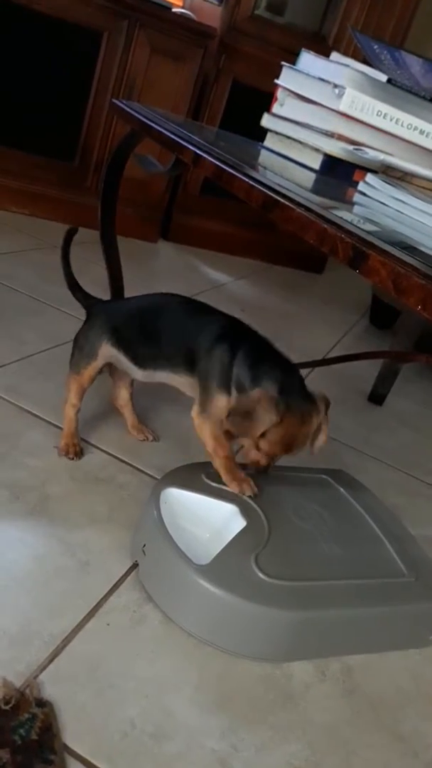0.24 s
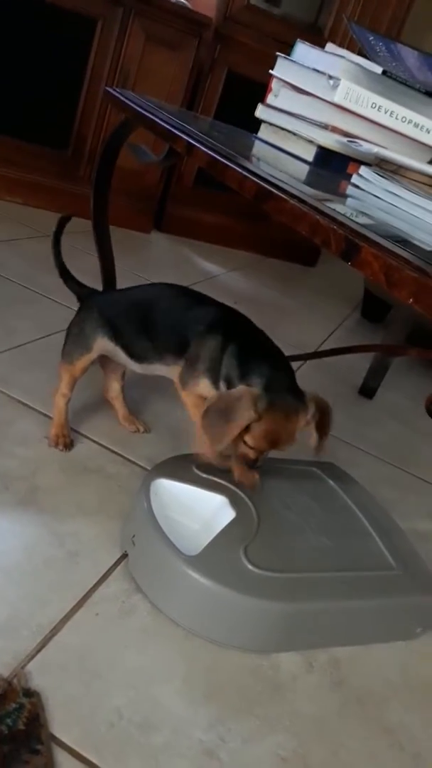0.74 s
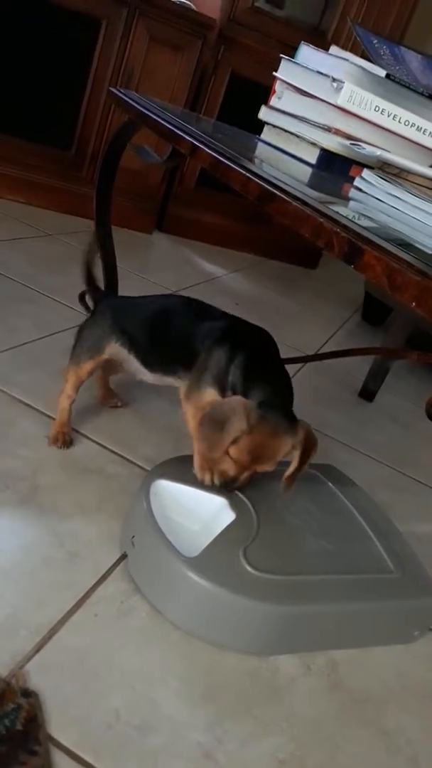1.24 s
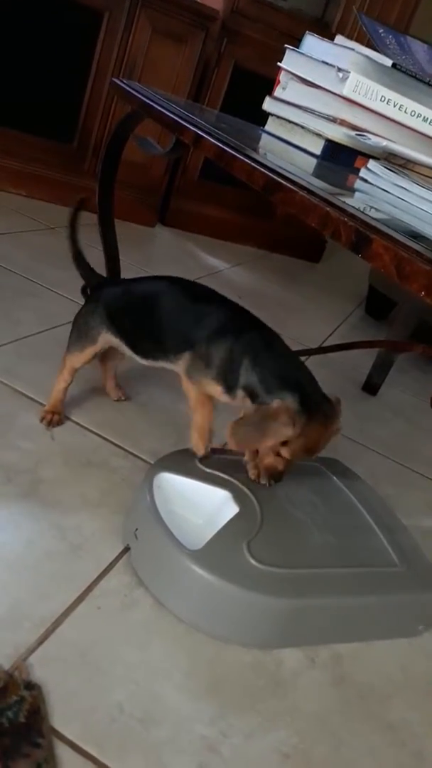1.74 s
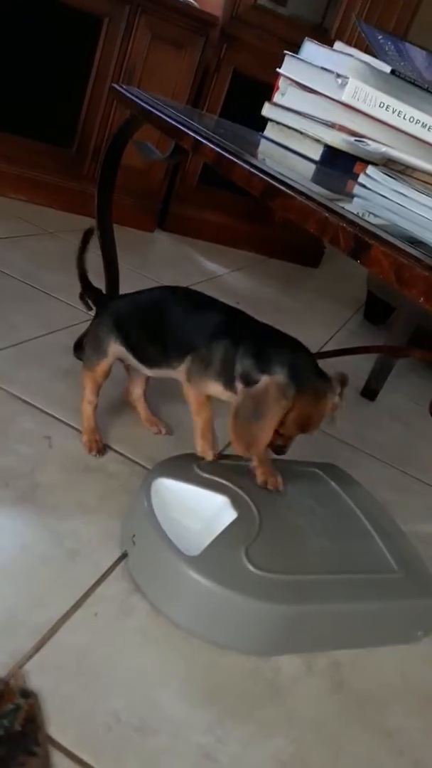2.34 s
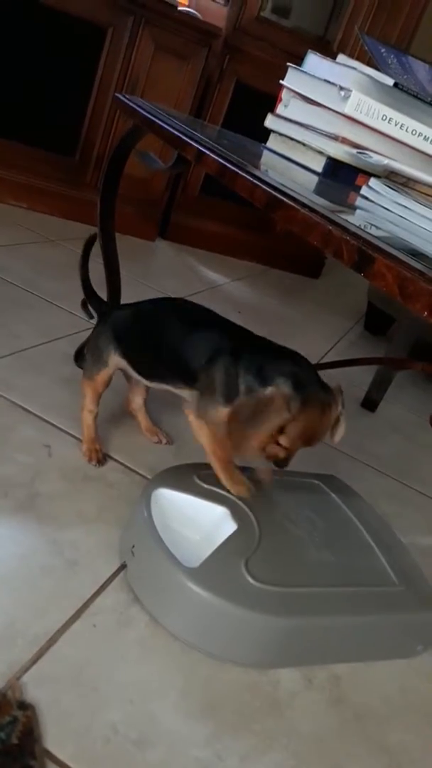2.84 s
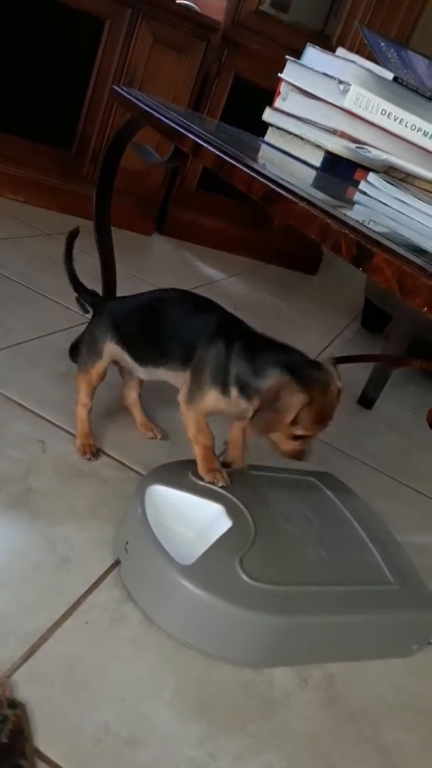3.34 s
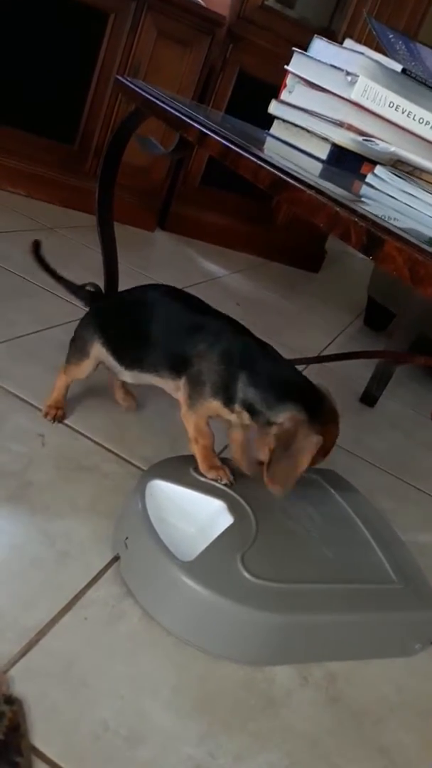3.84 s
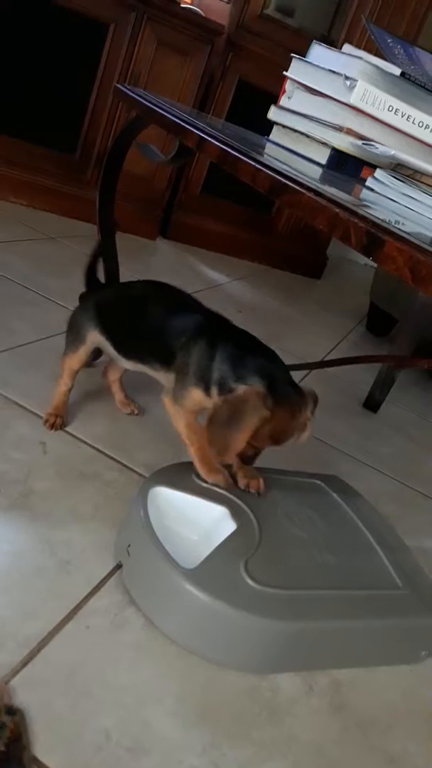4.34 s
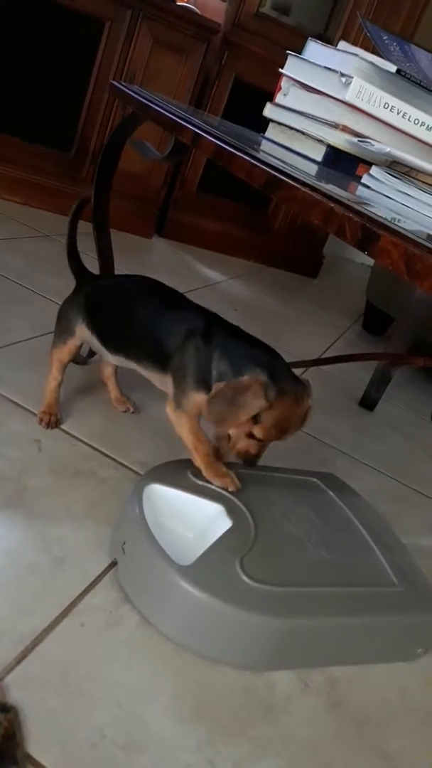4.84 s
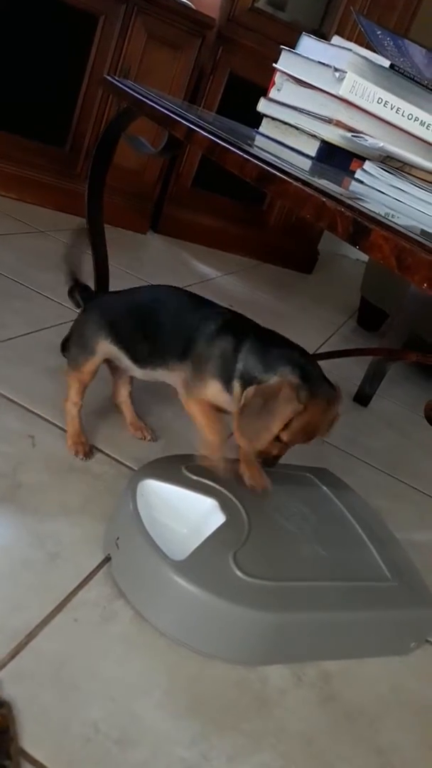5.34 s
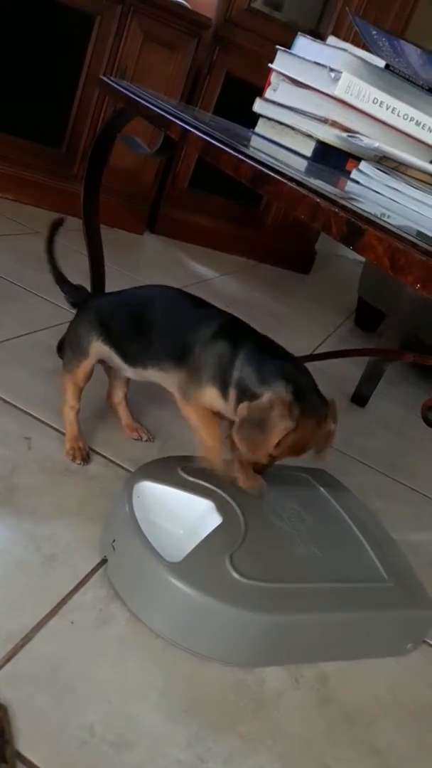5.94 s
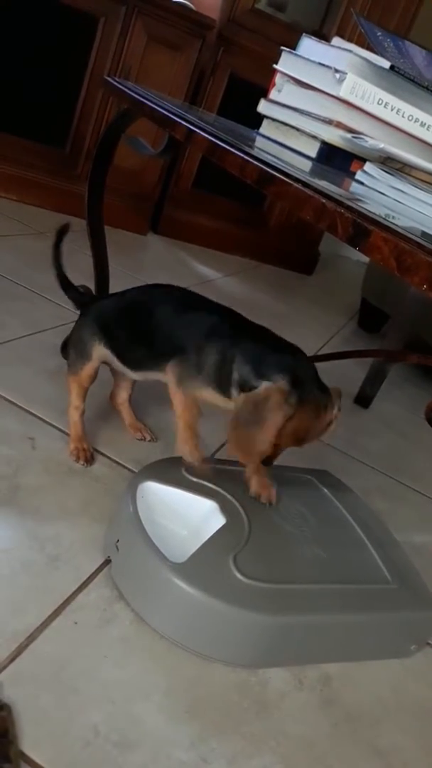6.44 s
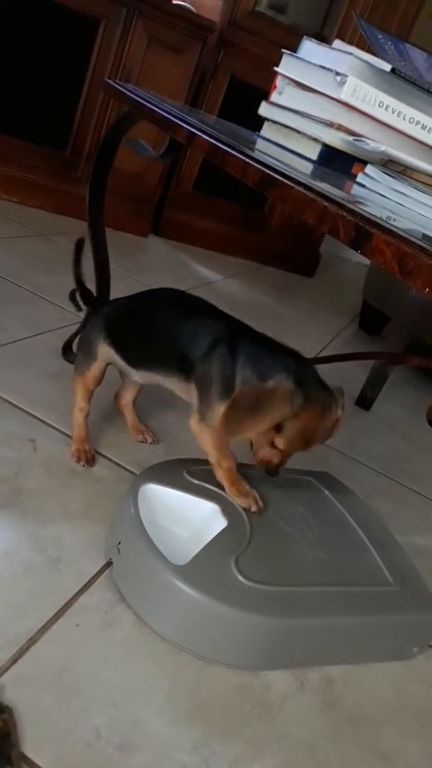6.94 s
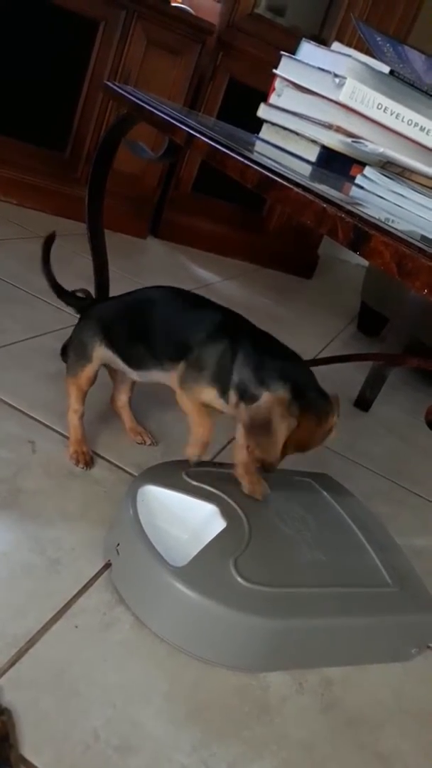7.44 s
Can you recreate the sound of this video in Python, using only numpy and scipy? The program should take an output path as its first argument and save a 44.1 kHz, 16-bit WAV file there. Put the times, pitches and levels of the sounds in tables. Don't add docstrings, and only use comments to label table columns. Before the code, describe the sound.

A small dog paws at a hollow hard plastic lid, a step from a stereo microphone in a furnished, tiled room. From 0 to 0.95 seconds, bright claw snaps come about seven a second, alternating single slaps with quick multi-toe rakes, over soft low drum thumps and gritty pad drag. From 1 to 1.6 it drops to faint ticks and light fur swishes. Strokes return around 1.7 and run briskly from 2 to 3.3, claws clicking and scraping the thin ringing wall. Around 3.4 to 4 there is a sparse lull with a few lighter taps. Digging rebuilds from 4.1, slightly uneven, with a hard claw catch near 4.5. From 5.4 until the end near 7.7, steady alternating scratches continue, growing firmer after 6.5. Short room reflections and very quiet hiss surround everything; it stops mid-digging.

```python
import sys
import numpy as np
from scipy import signal
from scipy.fft import rfft, irfft, next_fast_len
from scipy.io import wavfile
from scipy.ndimage import uniform_filter1d

SR = 44100
rng = np.random.default_rng(int(sys.argv[2]) if len(sys.argv) > 2 else 0)


def convert_level_to_amplitude(level_db):
    exponent = np.asarray(level_db, float) / 20
    return 10 ** exponent


def to_wav(sig):
    pcm = np.clip(np.atleast_2d(sig), -1, 1) * 32767
    pcm = np.round(pcm).astype(np.int16)
    wavfile.write(sys.argv[1], SR, pcm.T)


N = 338688


def unit(x):
    return x / np.sqrt(np.mean(x ** 2) + 1e-20)


def along(points, hz):
    f, v = np.transpose(points)
    return np.interp(np.log(hz + 1), np.log(f + 1), v)


def filtered(x, response):
    m = 2 * next_fast_len(N // 2 + 8192)
    return irfft(rfft(x, m) * response(np.fft.rfftfreq(m, 1 / SR)), m)[..., :N]


def causal(db):
    c = irfft(np.log(convert_level_to_amplitude(db)))
    half = c.shape[-1] // 2
    c = c * np.r_[1, 2 * np.ones(half - 1), 1, np.zeros(half - 1)]
    return np.exp(rfft(c))


def modes(table):
    def response(f):
        total = 0
        for k, (center, width, db) in enumerate(table):
            damping = 1j * f * width
            total = total + (-1) ** k * convert_level_to_amplitude(db) * damping / (center * center - f * f + damping)
        return total
    return response


# frequency in Hz, left-right likeness (1 is identical).
LIKENESS = [(60, 1), (130, 0.92), (290, 0.74), (640, 0.67), (1410, -0.058), (3100, 0.33), (6820, -0.34),
            (15000, -0.074)]


def pair(noises):
    def blend(hz):
        turn = np.arccos(np.clip(along(LIKENESS, hz), -1, 1)) / 2
        return np.array([np.cos(turn), np.sin(turn)])
    mid, side = filtered(noises, blend)
    return np.array([mid + side, mid - side])


def placed(seconds, shapes):
    start = np.round(seconds * SR).astype(int)
    at = (start[:, None] + np.arange(shapes.shape[-1])).ravel()
    return np.array([np.bincount(at, shapes[:, c].ravel(), N)[:N] for c in range(2)])


# frequency in Hz, level in dB per Hz.
ROOM_TONE = [(18, -43.5), (30, -20), (118, 0.5), (449, -24.5), (526, -22), (1500, -31), (2750, -81),
             (4420, -46.5), (8080, -35), (16000, -44)]


def air():
    noise = rng.standard_normal((2, N))
    hiss = filtered(noise, lambda hz: convert_level_to_amplitude(along(ROOM_TONE, hz) - along(PORT, hz).clip(-15)))
    return convert_level_to_amplitude(-63.5) * pair(unit(hiss))


# frequency in Hz, time to fall by 60 dB in seconds.
ROOM_DECAY = [(100, 0.058), (300, 0.52), (1000, 0.35), (4000, 0.35), (8000, .3), (15000, 0.24)]


def room(x, size):
    count = N // size + 1
    hz, t, z = signal.stft(rng.standard_normal((count, 2, SR // 2)), SR, nperseg=256)
    walls = convert_level_to_amplitude(-60 * t / along(ROOM_DECAY, hz)[:, None])
    scatter = convert_level_to_amplitude(along([(2000, 4.7), (14000, 10)], hz)[:, None] - 60 * t / 0.02)
    tails = signal.istft(z * (walls + scatter), SR, nperseg=256)[1]
    tails = tails / np.sqrt(np.mean(np.sum(tails ** 2, -1)))
    parts = np.pad(x.mean(0), (0, count * size - N)).reshape(count, 1, size)
    wet = signal.fftconvolve(parts, tails, axes=2)
    return pair(placed(np.arange(count) * size / SR + .002, wet))


# time in seconds, level in dB.
DRAG_LEVEL = [(0.0, -36), (.25, -50), (.85, -46), (1.0, -79), (1.32, -47), (1.45, -70.5), (1.75, -45),
              (2.1, -52), (3.25, -48), (3.5, -66.5), (3.95, -73), (4.13, -54), (4.66, -43), (5.09, -64),
              (5.32, -51), (6.7, -47.5), (7.16, -46.5), (7.68, -45)]
# frequency in Hz, level in dB per Hz.
DRAG_COLOR = [(300, 11), (1000, 3.5), (3000, -7.5), (7000, -9), (12000, -0.5), (16000, -12.5)]
# start in seconds, length in seconds, level in dB.
FUR_SWEEPS = [
    (0.99, 0.019, -53),
    (.785, 0.024, -50.5),
    (1.28, 0.043, -47),
    (1.16, 0.012, -64.5),
    (1.8, 0.01, -54),
    (3.522, 0.042, -67),
    (3.57, 0.015, -68),
    (3.87, 0.013, -50.5),
    (3.886, 0.0093, -50.5),
    (4.9, 0.037, -75),
]


def rub():
    s, db = np.transpose(DRAG_LEVEL)
    t = np.arange(N) / SR
    noise = rng.standard_normal((2, N))
    grain_db = 4.3 * unit(uniform_filter1d(rng.standard_normal(N), size=60))
    hiss = filtered(noise * convert_level_to_amplitude(grain_db), lambda hz: convert_level_to_amplitude(along(DRAG_COLOR, hz)))
    swish = filtered(rng.standard_normal((2, N)), modes([(9500, 5500, 0)]))
    sweeps = sum(convert_level_to_amplitude(level) * np.sin(np.pi * np.clip((t - at) / span, 0, 1))
                 for at, span, level in FUR_SWEEPS)
    return convert_level_to_amplitude(np.interp(t, s, db) - 12.5) * pair(unit(hiss)) + sweeps * pair(unit(swish))


# start in seconds, tip dB, edge dB re tip, pad dB, drum
# pitch in Hz.
SLAPS = [(0.0629, -11.5, -11, -42.5, 226), (0.3744, -8, -14, -41, 240), (.642, -6, -18, -47, 216),
         (1.2104, -31.5, 4, -58.5, 189), (1.5303, -27.5, -4, -73, 208), (1.8395, -15, -13, -49, 237),
         (2.0, -7, -15.5, -33.5, 221), (2.3123, -11.5, -15, -37.5, 218), (2.5865, -18, -12, -38.5, 219),
         (2.8777, -12, -15.5, -37, 244.7), (3.1825, -16, -9.5, -36, 219), (3.6884, -22, -20, -50, 192),
         (3.7954, -16, -17.5, -52.5, 205), (4.052, -26.5, -4, -65, 210), (4.299, -17.5, -10.5, -55, 183),
         (4.933, -17.5, -14.5, -45, 228), (5.079, -19.5, -15, -49.5, 213), (5.238, -18, -18, -52, 191),
         (5.8449, -12, -12, -37, 228), (6.144, -15, -13, -52, 193), (6.4431, -11, -11.5, -37.5, 244),
         (6.7443, -12.5, -12.5, -36, 240), (7.0464, -8.5, -19.5, -39.5, 188),
         (7.3665, -9.5, -14, -36.5, 216)]
# start in seconds, seconds until the
# claws bite, tip dB, edge dB re tip, pad dB.
RAKES = [(0.2091, .0154, -9.5, -10, -25.5), (0.5033, 0.0082, -11.5, -8, -28.5),
         (0.7851, .0104, -11.5, -11.5, -34.5), (0.928, 0.013, -17.5, -18.5, -40.5),
         (1.699, .0176, -13.5, -17, -35), (2.163, .0133, -10.5, -7.5, -29),
         (2.434, .0206, -14.5, -7.5, -39.5), (2.7236, .0182, -10, -9.5, -41.5),
         (3.0217, .0127, -12.5, -7.5, -38), (4.1402, 0.015, -17, -9.5, -34), (4.448, .0218, -18, 2.5, -39),
         (4.6205, .0163, -16, -8.5, -33.5), (4.77, .0105, -22, -2.5, -41), (5.389, .0233, -15, -2.8, -36.5),
         (5.5531, .0039, -17.5, -16.5, -47), (5.6874, .0099, -14.5, -10.5, -36),
         (5.9919, 0.015, -15, -14.5, -36.5), (6.286, .007, -16, -9.5, -36.5), (6.58, .0119, -8, -12.5, -30),
         (6.8912, .0103, -14.5, -10.5, -30), (7.1928, .0086, -10, -11.5, -28),
         (7.51, .0125, -14, -8.5, -28.5)]
# start in seconds, tip dB, edge dB re tip, pad dB, drum Hz.
FURTHER_STEPS = [(0.1014, -17.5, -4, -42, 216), (0.6647, -22, -11, -38.5, 207),
                 (1.2864, -28, -2.5, -63, 219), (1.648, -30.5, -3, -56, 218), (1.8743, -19, -11, -48, 208),
                 (1.9248, -10.5, -16.5, -47, 210), (2.1004, -10.5, -18, -41, 204),
                 (2.3324, -35, -6, -44.5, 219), (2.4395, -25, -0.5, -41.5, 222),
                 (2.7315, -29, -5, -38, 250), (2.987, -23, -15, -50, 250), (3.0415, -24, -1, -34, 250),
                 (3.2456, -16.5, -13.5, -50, 208), (3.3262, -21.5, -11.5, -48, 245),
                 (3.8995, -31, -4, -52.5, 210), (5.1122, -29.5, -11.5, -48.5, 244),
                 (5.2726, -41, -6, -57, 207), (5.4042, -20, -2, -49, 208), (5.57, -20, -12, -39, 247),
                 (5.8663, -17, -6, -39, 225), (6.1644, -23, -20, -38.5, 195), (6.9074, -25, -2, -39, 393),
                 (7.0723, -24, -18, -34.5, 215)]
SLAP_PAD_S, RAKE_PAD_S, FURTHER_PAD_S = .001, .008, -0.00398
RAKE_HZ = 207
RUMBLE_DB, RUMBLE_LAGS = -5, .3


def pads():
    rows = [(s + SLAP_PAD_S, db, hz) for s, _, _, db, hz in SLAPS]
    rows += [(s + RAKE_PAD_S, db, RAKE_HZ) for s, _, _, _, db in RAKES]
    rows += [(s + FURTHER_PAD_S, db, hz) for s, _, _, db, hz in FURTHER_STEPS]
    return [(s, db, hz, RUMBLE_DB - RUMBLE_LAGS * (db + 41)) for s, db, hz in rows]


# frequency in Hz, width in Hz, level in dB.
LID = [(108, 51, 0.5), (277, 52, -1), (379, 96, -4), (494, 72, -3), (608, 75, -8), (789, 34, -6.5),
       (962, 120, -13)]


def paws():
    s, db, drum_hz, rumble_db = np.transpose(pads())
    t = np.arange(4000) / SR
    swell = (t / 0.013) ** 1.25 * np.exp(1.5 - 1.545 * t / .012) * convert_level_to_amplitude(db[:, None])
    drum = swell * np.sin(2 * np.pi * drum_hz[:, None] * t)
    grit = rng.standard_normal((len(s), 2, len(t)))
    push = swell[:, None] * grit * convert_level_to_amplitude(rumble_db + 23)[:, None, None]
    start = np.maximum(s - .006, 0)
    rumble = pair(filtered(placed(start, push), modes(LID)))
    return placed(start, drum[:, None] * [[1], [1]]), rumble


# start in seconds, tip dB, edge dB re tip, wall dB re tip.
FLICKS = [(0.0721, -10, -25.5, -15), (0.1108, -8.5, -12.5, -22), (0.3367, -21, -25, -19),
          (0.657, -26, -15, -22), (2.012, -17, -7, -30), (2.0269, -21.5, -6, -11), (2.1086, -23, -20, -9),
          (2.1543, -19, -9.5, -11.5), (2.3617, -25.5, -7, -14), (2.9603, -15, -14, -16.5),
          (3.281, -21, -12.5, -27), (3.7163, -17.5, -25, -17.5), (3.743, -21.5, -15, -15.5),
          (3.8178, -13, -19, -20.5), (4.3368, -25.5, -26, -23), (4.458, -15, -3.5, -17),
          (4.4853, -4, -12.5, -15.5), (4.8021, -16, -7.5, -13), (5.339, -23, -15, -8),
          (5.624, -24, -10, -14), (5.936, -18.5, -14, -7.5), (5.9957, -28, 3, -10), (6.2167, -20, -13, -10),
          (6.5089, -20, -11, -11.5), (6.8287, -16.5, -12.5, -11), (7.1302, -18.5, -9.5, -8),
          (7.211, -12, -9, -7.5), (7.4418, -18, -13, -11.5), (7.528, -9, -8, -8),
          (7.6784, -10.5, -35, -10.5)]
# start in seconds, tip dB, edge dB re tip.
TICKS = [(1.077, -44, -3.5), (1.214, -35.5, -2.2), (1.2644, -34, -2), (1.3195, -36.5, -5.5),
         (1.3283, -31, -4), (1.493, -61.5, 11), (1.5228, -34, -16), (1.6855, -29.5, -6),
         (1.8355, -24.5, -9.5), (2.0919, -35.5, 5.5), (2.1276, -31.5, -11), (2.3418, -31, -1.5),
         (2.9439, -31, -5.5), (3.359, -25.5, -13.5), (4.378, -36, -8), (4.9477, -30, -10),
         (5.0969, -39.5, 3.5), (5.2821, -34, -1.5), (5.317, -28, -6.5), (5.5787, -26, -11.5),
         (5.7134, -23, -6.5), (5.9213, -30, -7), (6.1556, -26, -14), (6.418, -35.5, -5.5),
         (6.496, -41.5, 9), (6.797, -24.5, -14), (7.0655, -20.5, -14), (7.0925, -35, 4), (7.122, -34, -9),
         (7.359, -29, -13)]
TOUCH_DB, TOUCH_EDGE_DB = -12.5, 2
SECOND_DB, SECOND_EDGE_DB = -12, -1
LAST_TOE_S, LAST_TOE_DB, LAST_EDGE_DB = .0066, -5, 3
WALL_DB, WALL_FOLLOWS = -7.5, 0.57


def contacts():
    firm = [row[:3] for row in SLAPS + FURTHER_STEPS]
    for s, wait, db, edge_db, _ in RAKES:
        firm += [(s, db + TOUCH_DB, edge_db + TOUCH_EDGE_DB),
                 (s + wait / 2, db + SECOND_DB, edge_db + SECOND_EDGE_DB),
                 (s + wait, db, edge_db),
                 (s + wait + LAST_TOE_S, db + LAST_TOE_DB, edge_db + LAST_EDGE_DB)]
    rows = [(s, db, edge_db, WALL_DB + WALL_FOLLOWS * edge_db) for s, db, edge_db in firm]
    return rows + FLICKS + [(s, db, edge_db, edge_db - 0.6) for s, db, edge_db in TICKS]


def bursts(count, rise, t60, size):
    t = np.arange(size) / SR
    shape = (1 - np.exp(-t / rise)) * convert_level_to_amplitude(-60 * t / t60)
    grit = rng.standard_normal((count, 2, size)) * shape
    return grit * np.linalg.norm(shape) / np.linalg.norm(grit, axis=2, keepdims=True)


# frequency in Hz, width in Hz, level in dB.
SHELL = [(880, 520, -4.5), (1508, 151, 6), (1813, 254, 4.5), (2386, 506, 3.5), (3600, 300, -26.5)]


def struck(contact):
    s, db, edge_db, wall_db = np.transpose(contacts())
    tip = placed(s, convert_level_to_amplitude(db + 9)[:, None, None] * contact(.0001, 0.0024))
    edge = placed(s, convert_level_to_amplitude(db + edge_db + 1.0)[:, None, None] * contact(0.00018, 0.0087))
    wall = placed(s, convert_level_to_amplitude(db + wall_db + 10.5)[:, None, None] * contact(0.00098, 0.0098))
    tip = filtered(tip, modes([(15210, 5550, 0.0022)]))
    edge = filtered(edge, modes([(6030, 8100, 0)]))
    return tip + edge + filtered(wall, lambda hz: modes(SHELL)(hz) + convert_level_to_amplitude(4.0) * modes(LID)(hz))


# frequency in Hz, gain in dB.
FAR_PORT = [(1000, 1), (4000, -6), (8000, -6.5), (13000, -8.5)]


def claws():
    count = len(contacts())
    gritty = pair(struck(lambda rise, t60: bursts(count, rise, t60, size=1200)))
    even = struck(lambda rise, t60: np.full((1, 2, 1), np.sqrt(t60 * SR / np.log(1e6))))
    near = filtered(gritty, lambda hz: convert_level_to_amplitude(along(FAR_PORT, hz) * np.array([[1], [0]])))
    spread = filtered(even, lambda hz: convert_level_to_amplitude(along([(7000, 0), (14000, -6.5)], hz)))
    return near, spread


def scene():
    near, spread = claws()
    drum, rumble = paws()
    drag = rub()
    sent = convert_level_to_amplitude(-5) * spread + convert_level_to_amplitude(-6.5) * drum + convert_level_to_amplitude(-2) * rumble + convert_level_to_amplitude(-1.5) * drag
    echo = room(sent, size=8820)
    return near + drum + rumble + filtered(echo + drag + air(), lambda hz: hz < 15900)


def band_limit(x):
    return signal.sosfilt(signal.butter(12, 17020, fs=SR, output="sos"), x)


# frequency in Hz, gain in dB.
PORT = [(60, -12.5), (150, 0), (3000, 3), (5000, 4.5), (7000, 10), (7700, 2.5), (8700, -6), (11000, -2.5),
        (13000, 1), (15300, 9), (16000, -7), (16900, -19.5), (17300, -44)]
# frequency in Hz, left minus right in dB.
BALANCE = [(60, -3), (110, -2), (200, -2.0), (380, -0.5), (700, -0.5), (1290, -4), (2380, -1.5), (4400, 0),
           (8120, -2), (15000, -1.5)]


def record(dry):
    def ports(hz):
        gain_db = along(PORT, hz) + along(BALANCE, hz) * np.array([[.5], [-.5]])
        lag_s = 7e-5 * np.array([[1], [0]])
        return causal(gain_db) * np.exp(-2j * np.pi * hz * lag_s)
    return band_limit(filtered(dry, ports))


dry = scene()
out = record(dry)
to_wav(out)
```